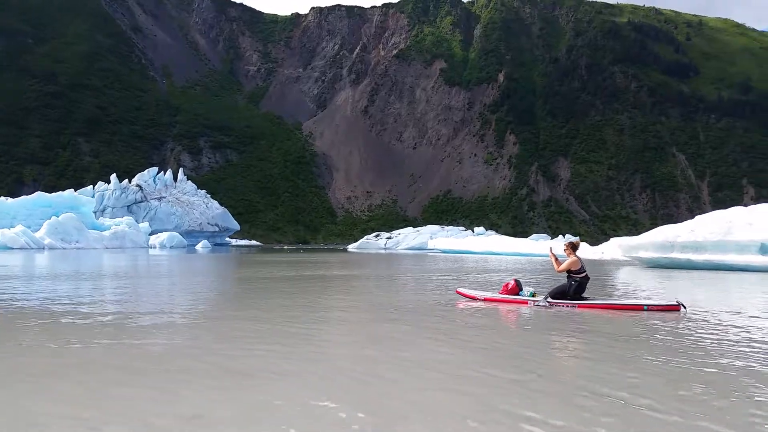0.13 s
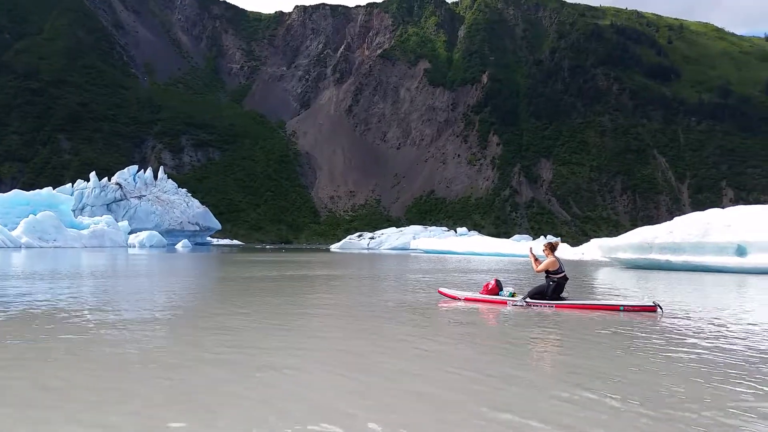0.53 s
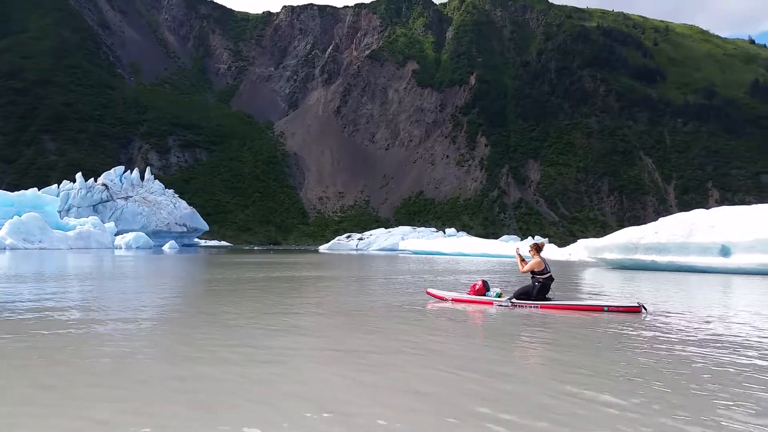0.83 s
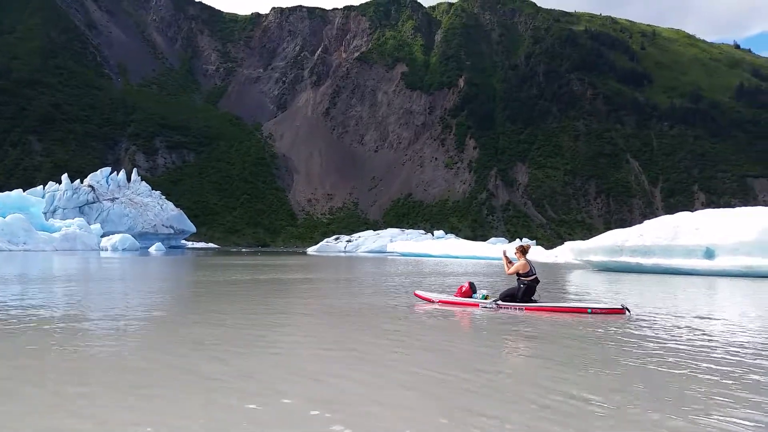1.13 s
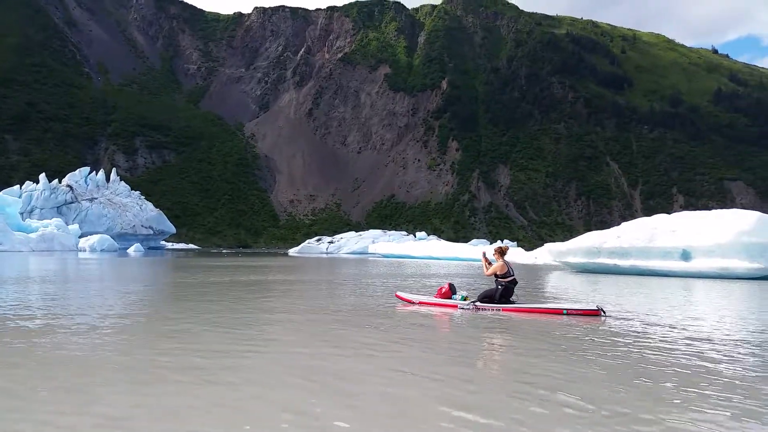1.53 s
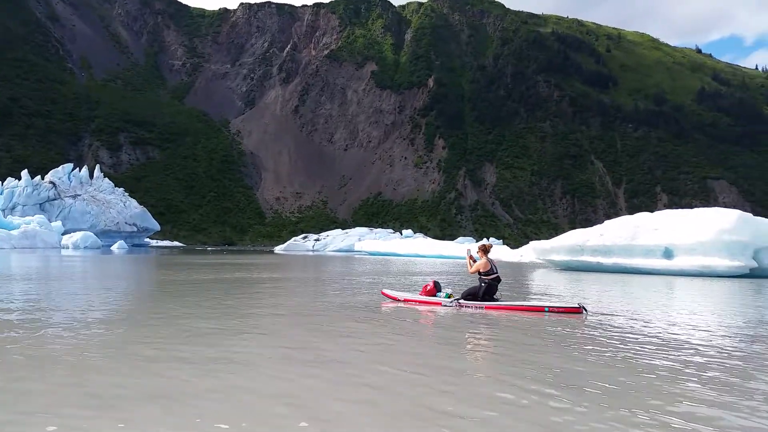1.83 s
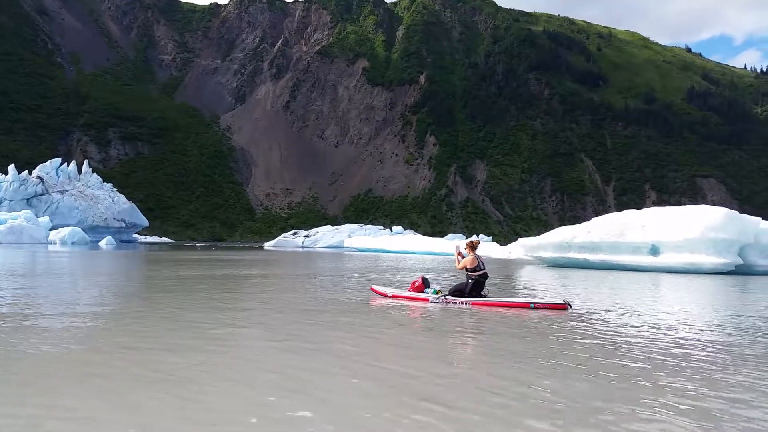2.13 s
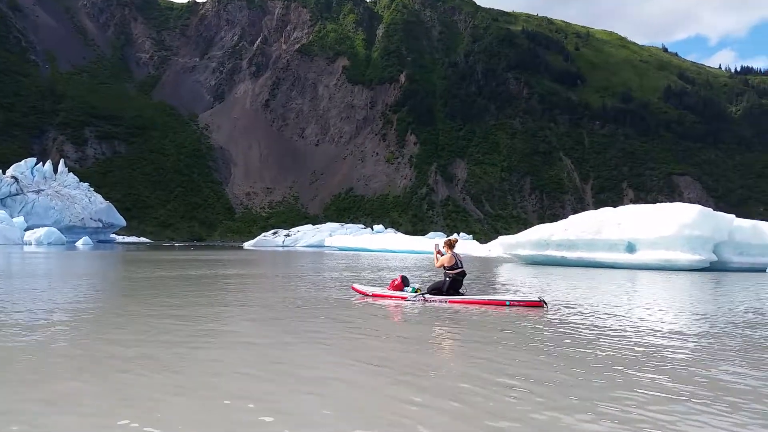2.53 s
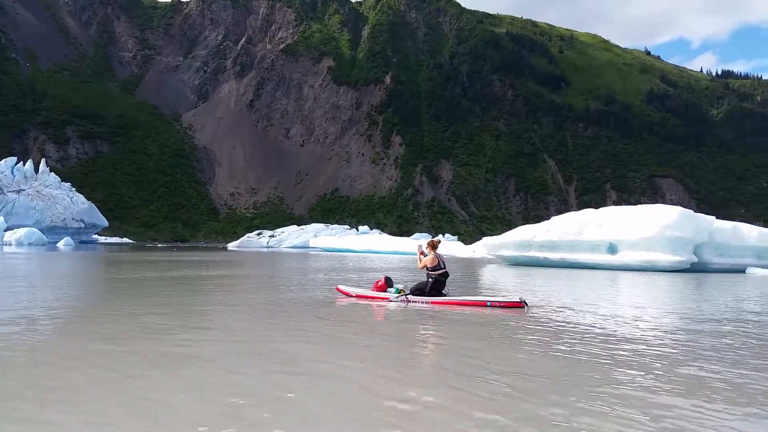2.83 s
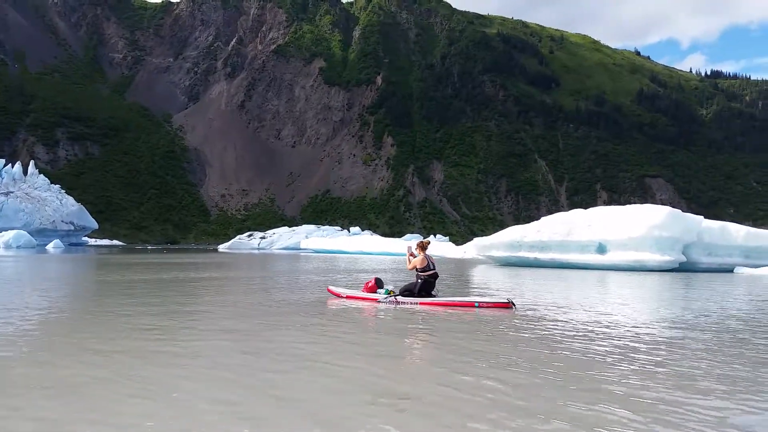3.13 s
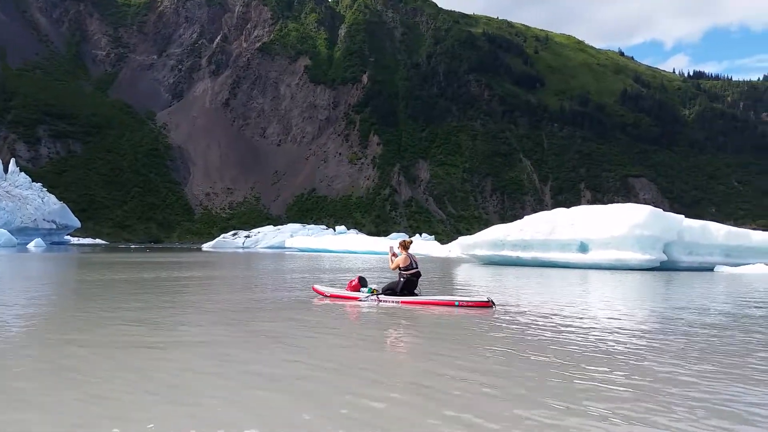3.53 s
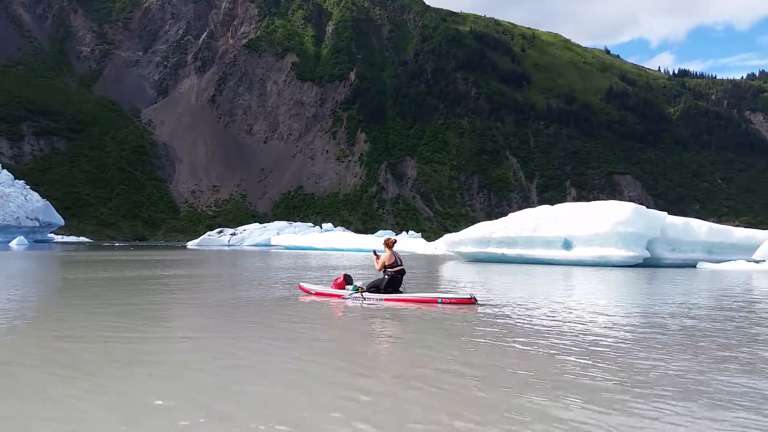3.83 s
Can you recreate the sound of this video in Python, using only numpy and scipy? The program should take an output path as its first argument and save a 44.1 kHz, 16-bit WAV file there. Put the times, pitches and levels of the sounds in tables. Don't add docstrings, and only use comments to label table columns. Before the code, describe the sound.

Wind thumps and pops directly on a small stereo microphone, with one hard slap at the very start, irregular low buffeting on each side, then gradual calming over faint water hiss on an open icy lake.

```python
import sys
import numpy as np
from scipy import signal
from scipy.fft import rfft, irfft
from scipy.io import wavfile
from scipy.ndimage import uniform_filter1d

SR = 44100
rng = np.random.default_rng(int(sys.argv[2]) if len(sys.argv) > 2 else 0)


def linear_from_db(decibels):
    return 10 ** (np.asarray(decibels, float) / 20)


def waveform_to_disk(signal):
    frames = np.transpose(np.atleast_2d(signal))
    scaled = np.clip(frames, -1, 1) * 32767
    samples = np.round(scaled).astype(np.int16)
    wavfile.write(sys.argv[1], SR, samples)


N = 176400

# pitch_hz, density_db [dB per Hz]
WASH_SPECTRUM = [(30, -65), (150, -77.5), (400, -80), (1000, -89), (2200, -97), (5000, -105), (6700, -128),
                 (9500, -129)]
# pitch_hz, density_db [dB per Hz]
CAVITY_SPECTRUM = [(1700, -115), (2500, -90), (3650, -89), (4050, -96), (4600, -81), (5150, -87.5),
                   (6000, -104), (6600, -130)]
# pitch_hz, density_db [dB per Hz]
FIZZ_SPECTRUM = [(9000, -135), (10500, -121), (12000, -107), (13200, -109), (15600, -105)]
# time_s, level_db
WATER_SWELL = [(0, -3.5), (2.2, -4.5), (2.45, -6), (3, -5.5), (3.3, -7.5), (3.6, -5.5), (3.8, -9.5),
               (4, -10)]
# start_s, peak_db, pitch_hz, pan_db [left over right]
DRIPS = [
    (.5155, -55, 2050, 1),
    (.5228, -45, 2020, .6),
    (1.326, -61, 1560, 4),
    (1.8726, -59, 1750, 5),
    (2.0055, -57, 1620, 4),
    (3.035, -54, 2000, 1.5),
    (3.260, -60, 1410, 4),
    (3.806, -64, 1460, 6),
    (3.813, -64, 1480, 6),
    (3.041, -62, 1880, 1.5),
]
# start_s, peak_db, pitch_hz
TICKS = [
    (.7507, -65, 12500),
    (.897, -61, 14500),
    (1.36, -58, 12100),
    (2.69, -68, 14000),
    (2.8494, -64, 14500),
    (3.5678, -67, 12700),
    (1.369, -66, 12100),
]
# time_s, pitch_hz, level_db
MOAN = [(.35, 600, -69), (.395, 800, -66), (.415, 950, -65), (.47, 925, -67), (.5, 930, -76),
        (.535, 985, -64), (.55, 985, -78)]
# time_s, left_db, right_db
BREEZE = [(0, -36, -35), (.2, -28, -36), (.3, -33, -40), (.5, -32, -34), (.7, -27, -43), (1.2, -30, -40),
          (1.45, -30, -40), (1.6, -33, -45), (1.85, -34, -36), (2.03, -38, -35), (2.3, -37, -35),
          (2.47, -46, -43), (2.7, -32, -37), (2.9, -43, -39), (3.1, -36, -39), (3.25, -42, -45),
          (3.5, -38, -43), (3.8, -46, -48)]
# pitch_hz, density_db [dB per Hz]
ROLL_SPECTRUM = [(10, -14), (30, -6), (72, 3), (120, -2.5), (200, -14.5), (900, -120)]
# pitch_hz, density_db [dB per Hz]
THUMP_SPECTRUM = [(10, -23.5), (28, -12.5), (65, -7.5), (125, 4), (175, -6.5), (240, -12.5), (330, -47.5),
                  (700, -130)]
# pitch_hz, density_db [dB per Hz]
EDGE_SPECTRUM = [(50, -28), (130, -5.5), (200, 6), (300, -3.5), (430, -13), (600, -27.5), (850, -52),
                 (1800, -130)]
# middle_s, peak_db, pitch_hz
FLICKS = [(0.157, -25.5, 380), (0.309, -21.5, 95), (.461, -24.5, 150), (.568, -31.5, 520),
          (1.14, -28.5, 330), (1.614, -34.5, 380), (2.642, -30, 186.6), (2.687, -31, 249),
          (2.715, -33.5, 217), (3.069, -32, 280), (3.361, -37, 238), (3.659, -31, 85), (3.845, -36, 64.6)]
# start_s, peak_db, sharpness [about 0-1]
SLAPS = [
    (0.0645, -4.5, 1.01),
]
# middle_s, half_length_s, peak_db, pitch_hz
GUSTS_LEFT = [(0.105, 0.021, -22.5, 111), (0.165, 0.0026, -5.5, 114), (0.173, 0.0035, -12, 128),
              (0.179, 0.001, -11.5, 228), (0.188, 0.0024, -6, 165), (0.199, 0.0018, -18.5, 222),
              (0.2, 0.012, -15, 98.4), (0.214, 0.0064, -21, 130), (0.535, 0.0022, -11, 149.4),
              (0.548, 0.0026, -12.5, 166), (0.562, 0.0087, -18.5, 157), (0.582, 0.0045, -15.5, 114),
              (0.659, 0.0075, -16.5, 115.6), (0.706, 0.0037, -17, 213), (0.725, 0.0035, -17.5, 131),
              (0.76, 0.015, -23, 150), (0.811, 0.0044, -13.4, 116), (0.823, 0.0017, -14, 172),
              (0.843, 0.0019, -14.5, 218), (0.867, 0.0045, -15, 108), (0.881, 0.0044, -13.5, 114),
              (1.012, 0.0062, -12.5, 133.6), (1.044, 0.0046, -13, 150), (1.1, 0.0064, -19.5, 177),
              (1.132, 0.012, -21, 115), (1.209, 0.0039, -15.5, 130), (1.233, 0.0042, -20.5, 255),
              (1.233, 0.009, -19, 133), (1.244, 0.012, -18, 169), (1.262, 0.006, -14.5, 99),
              (1.287, 0.0022, -18, 149), (1.37, 0.0028, -18.4, 143), (1.43, 0.0096, -25.5, 116),
              (1.511, 0.0094, -23.5, 84), (1.605, 0.0051, -20.3, 86), (1.617, 0.0035, -14.5, 108),
              (1.738, 0.0026, -21, 124.5), (1.774, 0.0046, -21, 113), (1.814, 0.0016, -23.5, 128),
              (1.829, 0.004, -22.5, 97), (2.147, 0.0048, -27, 146), (2.213, 0.0035, -20, 101),
              (2.357, 0.013, -24.5, 99), (2.61, 0.0065, -18.5, 59), (2.616, 0.0041, -21, 114),
              (2.728, 0.0039, -24, 115), (3.071, 0.0041, -19.5, 113), (3.358, 0.0097, -22.5, 85),
              (3.39, 0.0058, -28.5, 98.5), (3.576, 0.0046, -26, 109)]
# middle_s, half_length_s, peak_db, pitch_hz
GUSTS_RIGHT = [(0.021, 0.002, -15, 129.3), (0.059, 0.0028, -18, 127.4), (0.088, 0.0039, -22.5, 100),
               (0.107, 0.0025, -15.5, 131), (0.12, 0.0039, -22.5, 114), (0.144, 0.0056, -16.5, 99.3),
               (0.154, 0.028, -36, 50.7), (0.176, 0.02, -25, 103.4), (0.351, 0.0058, -18.5, 86.6),
               (0.394, 0.0034, -20, 85.7), (0.411, 0.0051, -21.5, 87), (0.431, 0.0076, -15.5, 78),
               (0.442, 0.0049, -12.5, 100), (0.45, 0.0033, -20.5, 155), (0.482, 0.008, -19.5, 87.5),
               (0.529, 0.0033, -17.5, 100), (0.563, 0.012, -24.5, 67), (0.885, 0.0048, -25, 128),
               (0.901, 0.0078, -20.5, 96.7), (0.927, 0.014, -39, 88), (1.041, 0.0087, -28, 67.4),
               (1.231, 0.026, -29.5, 97.4), (1.456, 0.0054, -27, 152), (1.462, 0.0098, -25, 59),
               (1.854, 0.0067, -23, 114), (1.936, 0.0091, -21, 77), (1.98, 0.018, -22.5, 101.6),
               (1.987, 0.0175, -35.5, 154.5), (2.007, 0.0039, -17.5, 110), (2.016, 0.038, -30.5, 59),
               (2.037, 0.0093, -18.5, 99.7), (2.085, 0.0054, -19.5, 124), (2.199, 0.011, -28, 77),
               (2.212, 0.0054, -20, 130), (2.227, 0.0051, -17, 89), (2.297, 0.0039, -19, 114.5),
               (2.58, 0.0077, -29, 102), (2.587, 0.012, -21, 45), (2.621, 0.0045, -18, 100),
               (2.678, 0.013, -26, 100), (2.73, 0.0046, -23.8, 59), (2.849, 0.0035, -24.6, 130),
               (2.876, 0.0072, -25, 114), (2.901, 0.0056, -30, 85.6), (2.939, 0.007, -26, 99),
               (3.113, 0.01, -26, 113.3), (3.147, 0.0041, -23.5, 87), (3.601, 0.0054, -25.0, 77),
               (3.689, 0.016, -35.5, 79.4), (3.881, 0.014, -37, 65)]


def evened(x):
    return x / np.sqrt(np.mean(x ** 2) + 1e-20)


def colour(x, points, pitch=1):
    f, db = np.transpose(points)
    hz = abs(np.fft.fftfreq(N, 1 / SR))
    density_db = np.interp(np.log(hz + 1), np.log(f * pitch), db)
    log_gain = np.log(linear_from_db(density_db) * np.sqrt(SR / 2))
    response = np.exp(np.conj(signal.hilbert(log_gain)))
    return irfft(rfft(x) * response[:N // 2 + 1], N)


def curve(table, column):
    return np.interp(np.arange(N) / SR, [row[0] for row in table], [row[column] for row in table])


def wander(seconds):
    span = max(int(seconds * SR), 2)
    return evened(uniform_filter1d(uniform_filter1d(rng.standard_normal(N), span), span))


def steadied(points, pitch, hold):
    x = evened(colour(rng.standard_normal(N), points, pitch))
    power = uniform_filter1d(uniform_filter1d(x ** 2, size=700), size=700)
    return evened(x / (power + 0.037) ** (hold / 2))


def add(mix, s, sound, pan_db):
    part = mix[:, round(s * SR):][:, :len(sound)]
    gains = linear_from_db(np.array([[pan_db / 2], [-pan_db / 2]]))[:len(mix)]
    part += sound[:part.shape[1]] * gains


def water():
    left, right, cavity, fizz_left, fizz_right = rng.standard_normal((5, N))
    right_db, same = -2.5, 0.033
    right = linear_from_db(right_db) * (same * left + np.sqrt(1 - same ** 2) * right)
    wash = colour(np.array([left, right]), WASH_SPECTRUM) * linear_from_db(1.0 * wander(0.022))
    wash[0] += colour(cavity, CAVITY_SPECTRUM) * linear_from_db(0.2 * wander(0.039))
    fizz = colour(np.array([linear_from_db(-1.5) * fizz_left, fizz_right]), FIZZ_SPECTRUM)
    fizz = fizz * linear_from_db(0.45 * wander(0.02) + 1.1 * wander(0.003))
    return (wash + fizz) * linear_from_db(curve(WATER_SWELL, column=1))


def drips():
    out, t = np.zeros((2, N)), np.arange(1500) / SR
    drip_s, rise = 0.0014, 0.006
    for s, db, hz, pan_db in DRIPS:
        u = t / drip_s
        tone = np.sin(2 * np.pi * hz * t * (1 + rise * u / 2))
        add(out, s, linear_from_db(db + 9) * u * np.exp(-u) * tone, pan_db)
    return out


def ticks():
    out, t = np.zeros((2, N)), np.arange(1500) / SR
    crack_s, tail_s, pan_db = 0.0005, 0.002, -3
    for (s, db, hz), noise in zip(TICKS, rng.standard_normal((len(TICKS), 1500))):
        crack = np.exp(-t / crack_s) + 0.5 * noise * np.exp(-t / tail_s)
        add(out, s, linear_from_db(db + 9) * crack * np.sin(2 * np.pi * hz * t), pan_db)
    return signal.sosfilt(signal.butter(12, 10600, "high", fs=SR, output="sos"), out)


def moan():
    t = np.arange(N) / SR
    hz = curve(MOAN, column=1) * (1 + 0.015 * wander(0.01))
    sounding = (t > MOAN[0][0]) * (t < MOAN[-1][0])
    level = linear_from_db(curve(MOAN, column=2) + 3.5 * wander(0.012)) * sounding
    return level * np.sin(2 * np.pi * np.cumsum(hz) / SR) * linear_from_db(np.array([[3], [-4]]))


def flicks():
    out, u = np.zeros((2, N)), np.linspace(-1, 1, num=2001)
    half_s, bell_turns = 1000 / SR, 0.65
    for (s, db, hz), turn in zip(FLICKS, rng.random(len(FLICKS))):
        turns = hz * u * half_s
        bell = np.exp(-(turns / bell_turns) ** 2 / 2)
        add(out[:1], s - half_s, linear_from_db(db) * bell * np.cos(2 * np.pi * (turns + turn)), 0)
    return out


def slaps():
    out, t = np.zeros((2, N)), np.arange(3000) / SR
    start_hz, end_hz, fall_s = 330, 95, 0.0017
    for s, db, sharp in SLAPS:
        hz = end_hz + (start_hz * sharp - end_hz) * np.exp(-t / fall_s)
        onset = 1 - np.exp(-(t * sharp / 0.0012) ** 2)
        decay = np.exp(-(t / 0.0071) ** 1.26)
        add(out[:1], s, linear_from_db(db + 2) * onset * decay * np.cos(2 * np.pi * np.cumsum(hz) / SR), 0)
    return signal.sosfilt(signal.butter(4, 650, fs=SR, output="sos"), out)


def lulls():
    t, lull_s, depth_db = np.arange(N) / SR, 0.03, -16
    return depth_db * sum(np.exp(-((t - s) / lull_s) ** 2) for s in (1.555, 1.715, 3.255, 3.76, 3.97))


def pops():
    pops_per_s, share = 90, 0.7
    turns = np.cumsum(pops_per_s * linear_from_db(3.0 * wander(0.02))) / SR
    clicks = np.diff(np.floor(turns), prepend=0) * rng.choice([-1., 1.], N)
    train = clicks * linear_from_db(3.7 * np.clip(rng.standard_normal(N), -2, 2))
    return np.sqrt(share) * evened(train) + np.sqrt(1 - share) * rng.standard_normal(N)


def wind(gusts, breeze_db, pitch):
    breeze_edge_db, edge_slope = -23, 0.6
    wake_db, wake_spread, sag = -13, 2.2, 0.12
    edge_db, edge_db_per_octave, edge_lead_s = -18, 12.5, 0.004
    port_limit = 0.7
    t, lumps_db = np.arange(N) / SR, 2.5 * wander(0.02)
    swings, wake_power = np.zeros(N), np.zeros(N)
    roll_power = linear_from_db(breeze_db + lumps_db) ** 2
    edge_power = roll_power * linear_from_db(breeze_edge_db + edge_slope * (breeze_db + 38 + lumps_db)) ** 2
    for (middle, length, db, hz), turn in zip(gusts, rng.random(len(gusts))):
        near = slice(max(round((middle - 0.2) * SR), 0), round((middle + 0.2) * SR))
        u = (t[near] - middle) / length
        turns = turn + hz * length * u * (1 - sag * u / 2)
        swings[near] += linear_from_db(db) * np.exp(-u ** 2 / 2) * np.cos(2 * np.pi * turns)
        wake_power[near] += linear_from_db(db + wake_db) ** 2 * np.exp(-(u / wake_spread) ** 2)
        bright_db = db + edge_db + edge_db_per_octave * np.log2(hz / 120)
        edge_power[near] += linear_from_db(bright_db) ** 2 * np.exp(-(u / 1.81) ** 2)
    train = pops()
    edge = colour(np.sqrt(edge_power) * train, EDGE_SPECTRUM, pitch)
    edge = edge / np.std(colour(train, EDGE_SPECTRUM, pitch))
    edge = np.roll(edge, -round(edge_lead_s * SR))
    roll = np.sqrt(roll_power) * steadied(ROLL_SPECTRUM, pitch, hold=0.33)
    wake = np.sqrt(wake_power) * steadied(THUMP_SPECTRUM, pitch, hold=0.1)
    return port_limit * np.tanh((roll + wake + edge + swings) / port_limit)


def scene():
    left = wind(GUSTS_LEFT, curve(BREEZE, column=1) + lulls(), pitch=0.96)
    right = wind(GUSTS_RIGHT, curve(BREEZE, column=2) + lulls() / 2, pitch=0.78)
    return water() + drips() + ticks() + moan() + flicks() + slaps() + np.array([left, right])


def top_cut(x):
    return signal.sosfilt(signal.butter(12, 16790, fs=SR, output="sos"), x)


def record(dry):
    t, fade_s, top_hz = np.arange(N) / SR, 0.004, 15745
    ends = np.sin(np.pi / 2 * np.clip(np.minimum(t, t[-1] - t) / fade_s, 0, 1)) ** 2
    limited = irfft(rfft(dry * ends) * (np.fft.rfftfreq(N, 1 / SR) < top_hz), N)
    return top_cut(limited)


dry = scene()
out = record(dry)
waveform_to_disk(out)
```